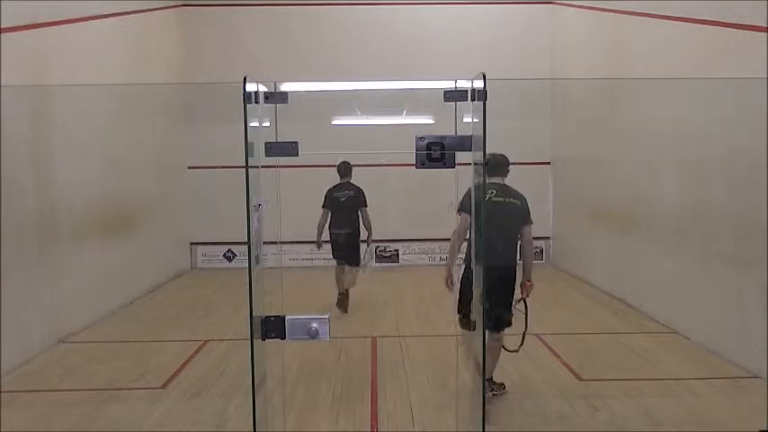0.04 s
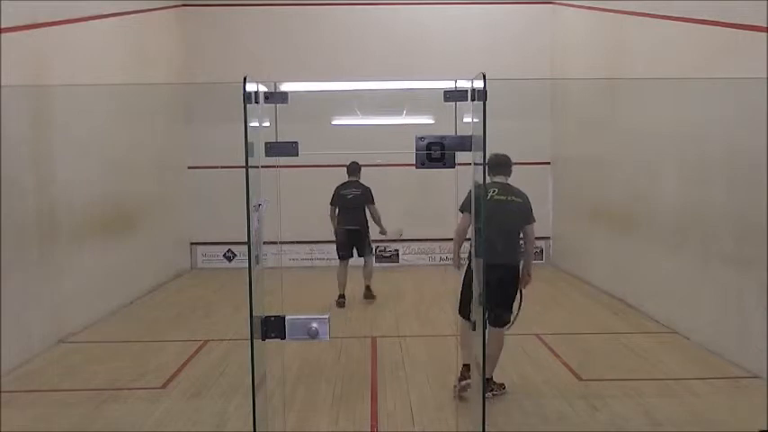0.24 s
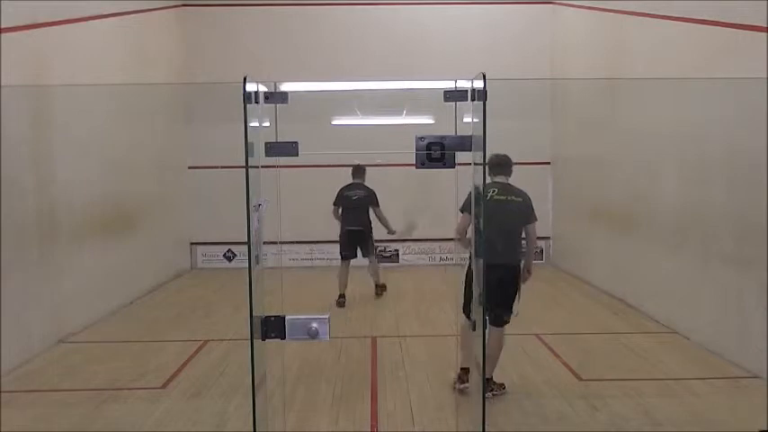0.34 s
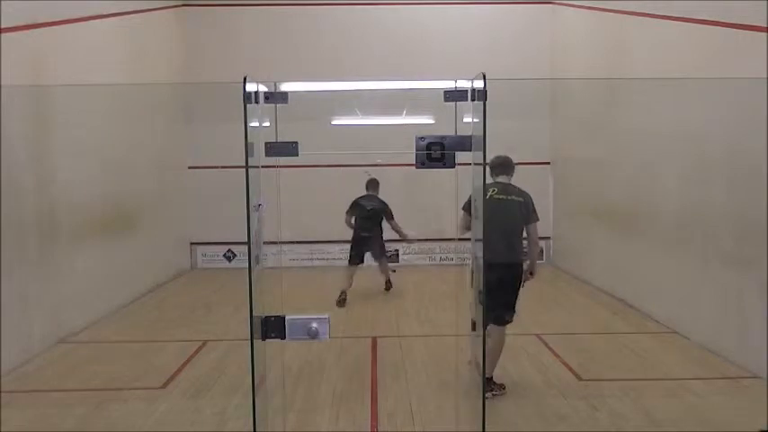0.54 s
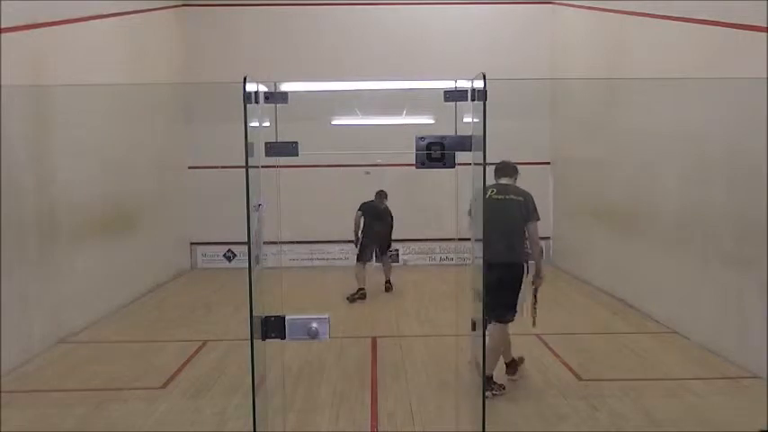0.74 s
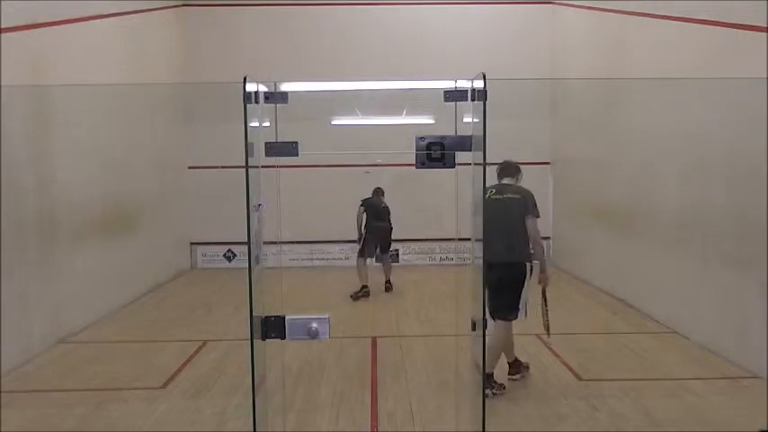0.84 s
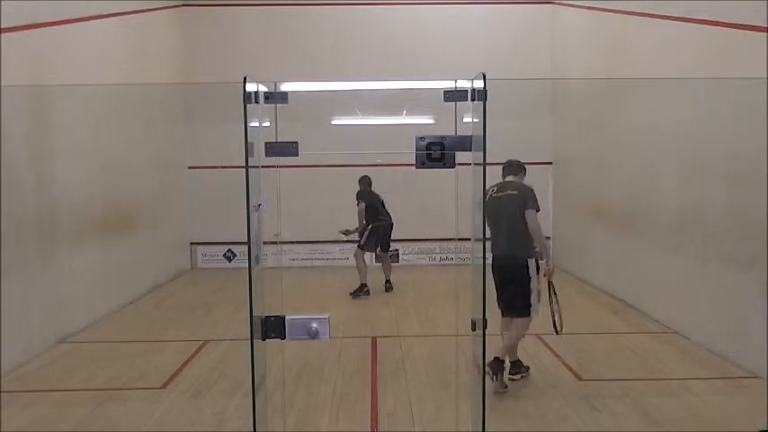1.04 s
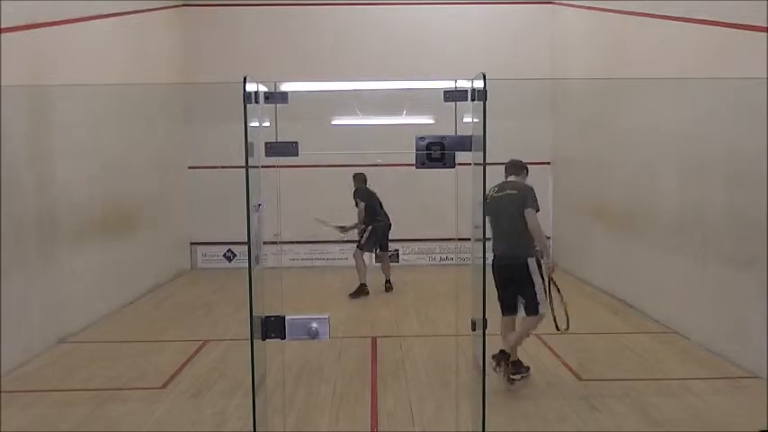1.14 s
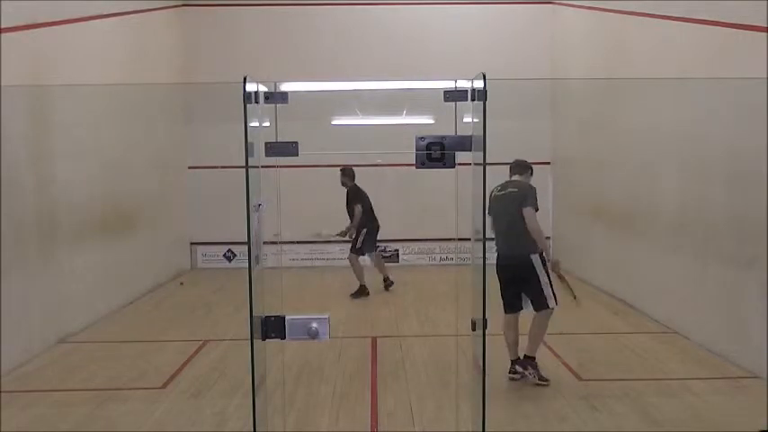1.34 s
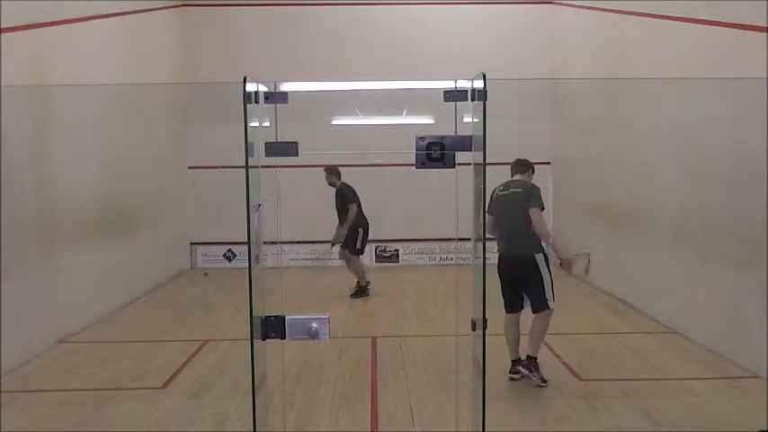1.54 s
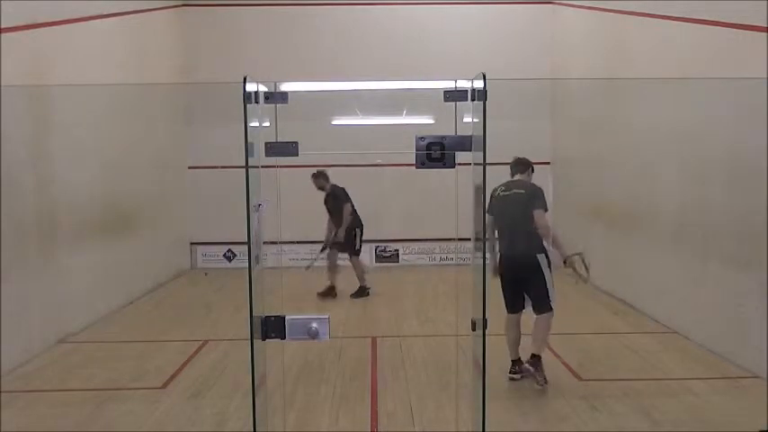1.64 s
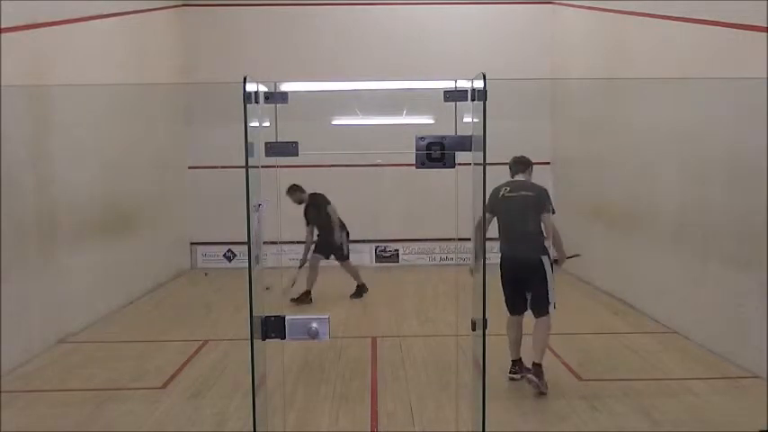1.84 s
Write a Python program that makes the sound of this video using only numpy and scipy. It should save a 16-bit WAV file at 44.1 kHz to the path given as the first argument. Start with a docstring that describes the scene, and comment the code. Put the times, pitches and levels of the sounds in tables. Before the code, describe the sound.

Echoing squash shot on an indoor court, with ball bounces, footsteps and a shoe squeak.

```python
"""Indoor racket court, heard from behind its glass back wall during a rally.
The hollow ball bounces, is struck, booms off the front wall and bounces again; each blow
returns as hard echoes and a long wash. Shoes thump, scuff and squeak on the sprung wooden
floor, over steady hall air and the dying wash of earlier play."""
import sys
import numpy as np
from scipy import signal
from scipy.fft import rfft, irfft
from scipy.io import wavfile
from scipy.ndimage import uniform_filter1d

SR = 44100
rng = np.random.default_rng(int(sys.argv[2]) if len(sys.argv) > 2 else 0)


def waveform_to_disk(signal):
    """Save audio, clipped to [-1, 1], as 16-bit WAV at the path in sys.argv[1]."""
    frames = np.transpose(np.atleast_2d(signal))
    scaled = np.clip(frames, -1, 1) * 32767
    samples = np.round(scaled).astype(np.int16)
    wavfile.write(sys.argv[1], SR, samples)


N = 83790
T = np.arange(N) / SR
CONTACT_S = 0.0038


def amp(db):
    """Decibels to gain."""
    return 10 ** (np.asarray(db) / 20)


def unit(x):
    """Scale to rms 1."""
    return x / np.sqrt(np.mean(x ** 2) + 1e-20)


def read(points, hz):
    """Interpolate a table over log frequency."""
    points_hz, values = np.transpose(points)
    return np.interp(np.log(hz + 1), np.log(points_hz + 1), values)


def add(mix, start_s, sound):
    """Mix a sound in at start_s."""
    part = mix[:, max(round(start_s * SR), 0):][:, :sound.shape[-1]]
    part += sound[..., :part.shape[1]]


def noise(colour):
    """Diffuse stereo noise, rms 1, near mono in the bass; colour rows: freq_hz, level_db."""
    # side against mid: freq_hz, level_db
    width = [(250, -21.5), (600, -15.5), (1200, -10), (5000, -4.5), (8000, -1), (13000, -4.5)]
    hz = np.fft.rfftfreq(N, 1 / SR)
    mid, side = rfft(rng.standard_normal((2, N))) * amp(read(colour, hz))
    side = side * amp(read(width, hz))
    return unit(irfft([mid + side, mid - side], N))


def pulse(colour, size=4096):
    """Minimum-phase ring with the energy of 10 ms at rms 1."""
    hz = abs(np.fft.fftfreq(size, 1 / SR))
    log_gain = np.log(amp(read(colour, hz)))
    spectrum = np.exp(np.conj(signal.hilbert(log_gain)))
    ring = np.fft.ifft(spectrum).real[:size // 2]
    return ring / np.linalg.norm(ring) * np.sqrt(SR / 100)


def wash(colour, build_s, treble_build_s=0.032):
    """Reverberation of one blow: builds up, treble last, then dies band by band."""
    # court decay: freq_hz, t60_s
    court = [(100, 0.04), (300, 1.86), (1200, 2), (5000, 1.5), (8000, 1), (14000, 0.7)]
    hz, t, bands = signal.stft(noise(colour), SR, nperseg=512)
    rise_s = np.minimum(hz / 4000, 1)[:, None] * treble_build_s
    rise = 1 - np.exp(-t / (rise_s + 1e-12))
    decay = amp(-60 * t / read(court, hz)[:, None])
    _, tail = signal.istft(bands * decay * rise, SR, nperseg=512)
    return tail[:, :N] * np.minimum(T / build_s, 1)


def in_court(dry, room_db):
    """A sound plus its reverberation."""
    tail = wash([(20, 0), (20000, 0)], build_s=0.02)
    wet = signal.fftconvolve(dry, tail / np.linalg.norm(tail[0]), axes=1)[:, :N]
    return dry + amp(room_db) * wet


def hall(air_db=-40, earlier_db=-28.5, fade_db_per_s=9):
    """Steady air, and the wash of earlier play dying away."""
    # air and wash spectra: freq_hz, level_db
    air = [(28, -34), (75, 4.5), (150, -5), (600, -0.5), (2700, -27.5), (5000, -25), (13000, -39)]
    earlier = [(50, -8.5), (320, 5.5), (1450, 2), (2400, -13.5), (4000, -17.5), (8000, -23.5), (15000, -40)]
    return amp(air_db) * noise(air) + amp(earlier_db - fade_db_per_s * T) * noise(earlier)


def scuffs(grit_db=2.8):
    """Soles brush the boards in short gritty swells."""
    # scuffs: start_s, length_s, level_db
    brushes = [(0.078, 0.12, -45), (0.241, 0.17, -39.5), (1.057, 0.03, -48.5), (1.29, 0.15, -49)]
    # friction spectrum: freq_hz, level_db
    colour = [(700, -7), (3000, 2), (5000, 2), (8500, -7), (15000, -26)]
    out = np.zeros((2, N))
    for start_s, length_s, level_db in brushes:
        t = T[:round(length_s * SR)]
        grit = amp(grit_db * unit(uniform_filter1d(rng.standard_normal(N), size=90)))
        swell = np.sin(np.pi * t / length_s) ** 0.46
        add(out, start_s, amp(level_db) * swell * (noise(colour) * grit)[:, :len(t)])
    return in_court(out, room_db=4.5)


def squeaks(waver_depth=0.03):
    """Rubber soles stick and slip at a high, unsteady pitch."""
    # squeaks: start_s, length_s, pitch_hz, level_db
    slips = [(.665, 0.06, 6250, -32.5), (.675, 0.05, 5790, -29), (.738, 0.045, 5770, -31),
             (0.68, 0.16, 6450, -39.5)]
    out = np.zeros((2, N))
    for start_s, length_s, pitch_hz, level_db in slips:
        t = T[:round(length_s * SR)]
        waver = unit(uniform_filter1d(rng.standard_normal(N), size=70))[:len(t)]
        phase = 2 * np.pi * np.cumsum(pitch_hz * (1 + waver_depth * waver)) / SR
        add(out, start_s, amp(level_db) * np.sin(np.pi * t / length_s) * np.sin(phase))
    return in_court(out, room_db=-1)


def low_thuds(rise_s=0.0075, band_ratio=1.41):
    """Footfalls on the sprung floor, a low ring just after the racket stroke, and one heel slap."""
    # thuds: start_s, level_db, pitch_hz, t60_s
    thuds = [(0.064, -31, 97, 1), (.2, -29.5, 104, .6), (.232, -19.5, 229, 0.95), (0.312, -23.5, 135, 0.18),
             (.428, -18, 355, 0.2), (0.602, -35.5, 102, 0.15), (1.472, -31.5, 110, 0.22),
             (1.532, -32.5, 81, 1), (1.533, -31, 594, .45)]
    # heel slap: start_s, level_db, t60_s
    heel = (1.471, -30.5, 0.14)
    out = np.zeros((2, N))
    rise = np.minimum(T / rise_s, 1)
    for start_s, level_db, hz, t60_s in thuds:
        band = [(hz / 3, -34), (hz / band_ratio, -7), (hz, 0),
                (hz * band_ratio, -7), (hz * 3, -30), (hz * 20, -65)]
        thud = noise(band) * rise * amp(-60 * T / t60_s)
        thud /= np.sqrt(np.sum(thud[0] ** 2) / (SR * 0.028))  # energy of 28 ms at rms 1
        add(out, start_s, amp(level_db) * thud)
    start_s, level_db, t60_s = heel
    slap = noise([(400, -17), (3000, 0), (6000, -13), (15000, -40)])
    add(out, start_s, amp(level_db - 60 * T / t60_s) * rise * slap)
    return in_court(out, room_db=-8.5)


def ticks(t60_s=0.011):
    """Thin, sharp ticks, the first an overload click on the loudest boom."""
    # ticks: start_s, level_db
    arrivals = [(.5122, -36), (.5901, -23), (1.083, -44)]
    # tick spectrum: freq_hz, level_db
    colour = [(2000, -13), (12000, 4), (16000, -10)]
    out = np.zeros((2, N))
    for start_s, level_db in arrivals:
        add(out, start_s, amp(level_db - 60 * T / t60_s) * noise(colour))
    return out


def hollow_note(start_s=0.42, level_db=-18, build_s=0.041, t60_s=2.29):
    """The ball's own note hangs between the walls, outlasting the wash."""
    # note spectrum: freq_hz, level_db
    colour = [(490, -45), (535, 0.5), (625, 4), (700, -50)]
    out = np.zeros((2, N))
    envelope = amp(level_db - 60 * T / t60_s) * np.minimum(T / build_s, 1)
    add(out, start_s, envelope * noise(colour))
    return out


def bounces():
    """The ball meets the floor and fills the court with a wash."""
    # floor contacts: start_s, level_db
    contacts = [(.223, -19.5), (1.224, -23.5)]
    # wash spectrum: freq_hz, level_db
    colour = [(50, -23), (340, 1), (1500, -1), (2600, -18), (3800, -20), (15000, -52)]
    out = np.zeros((2, N))
    for start_s, level_db in contacts:
        add(out, start_s, amp(level_db) * wash(colour, build_s=0.025))
    return out


def knocks(t60_s=0.075, band_ratio=1.063):
    """Short, pitched knocks of the ball on wood and plaster."""
    # knocks: start_s, level_db, pitch_hz
    contacts = [(.261, -13.5, 940), (.380, -13, 780), (.424, -15, 800), (.528, -10, 810),
                (1.266, -21, 1140)]
    out = np.zeros((2, N))
    rise = np.minimum(T / CONTACT_S, 1)
    for start_s, level_db, hz in contacts:
        band = [(hz / 2, -30), (hz / band_ratio, 0), (hz * band_ratio, 0), (hz * 2, -30), (hz * 10, -60)]
        add(out, start_s, amp(level_db - 60 * T / t60_s) * rise * noise(band))
    return out


def cracks(t60_s=0.023, snap_db=-10.5, dull_above_hz=5000):
    """Hard walls throw back bright snaps, each with a spray of scatter; weaker ones are duller."""
    # reflections: start_s, level_db
    arrivals = [(0.4303, -25.5), (0.4383, -22.5), (.528, -18.5), (0.5303, -22.5), (0.5342, -19.5),
                (0.5843, -19.5), (.5875, -19.5)]
    # loudest crack's spectrum: freq_hz, level_db
    bright = [(300, -39), (1500, 12), (2700, -1.5), (3900, 10), (6000, 7.5), (9000, -3.5), (16000, -17)]
    out = np.zeros((2, N))
    loudest_db = max(db for _, db in arrivals)
    for start_s, level_db in arrivals:
        loss_db_per_oct = loudest_db - level_db
        colour = [(hz, db - loss_db_per_oct * max(np.log2(hz / dull_above_hz), 0)) for hz, db in bright]
        add(out, start_s, amp(level_db + snap_db) * pulse(colour))
        add(out, start_s, amp(level_db - 60 * T / t60_s) * noise(colour))
    return out


def blow(arrivals, wash_colour, tail):
    """The hollow ball squashes and booms; the walls send copies that blur into a wash."""
    # boom spectrum: freq_hz, level_db
    boom_colour = [(130, -36), (300, -11.5), (460, -17), (545, 2.5), (620, 3.5), (700, -9.5), (880, -7),
                   (1100, -23.5), (2000, -13.5), (3300, -52.5)]
    boom = pulse(boom_colour)
    squash = np.sin(np.pi / 2 * np.minimum(T[:len(boom)] / CONTACT_S, 1))
    out = np.zeros((2, N))
    for start_s, level_db in arrivals:
        add(out, start_s, amp(level_db) * boom * squash)
    start_s, level_db, build_s = tail
    add(out, start_s, amp(level_db) * wash(wash_colour, build_s))
    return out


def racket_stroke():
    """The racket strikes the ball."""
    # boom and echoes: start_s, level_db
    arrivals = [(.379, -16), (.388, -17), (.410, -13.5), (.4265, -10.5), (.4365, -9), (.453, -15),
                (.4645, -14)]
    # wash spectrum: freq_hz, level_db
    colour = [(120, -43), (330, -7), (450, -14.5), (580, -3.5), (880, -5), (1100, -17), (2000, -19),
              (2700, -31), (8000, -33), (15000, -66)]
    # wash onset: start_s, level_db, build_s
    tail = (.408, -14, 0.0081)
    return blow(arrivals, colour, tail)


def front_wall_hit():
    """The ball booms off the front wall."""
    # boom and echoes: start_s, level_db
    arrivals = [(.5085, -6.5), (.518, -16), (.530, -12.5), (.541, -13.5), (.548, -15), (.5595, -11.5),
                (.574, -12), (.594, -13), (.603, -13), (.638, -12.5), (.837, -20.5)]
    # wash spectrum: freq_hz, level_db
    colour = [(130, -55), (300, -13.5), (560, -1.5), (880, -4.5), (1050, -18.5), (1400, -13.5), (2250, -19),
              (2900, -29.5), (3900, -22.5), (6500, -24.5), (11000, -34), (15500, -54)]
    # wash onset: start_s, level_db, build_s
    tail = (.516, -13.5, 0.015)
    return blow(arrivals, colour, tail)


def scene():
    """Ball, ticks, thuds, shoes and hall together."""
    shot = racket_stroke() + front_wall_hit() + hollow_note() + cracks()
    return shot + ticks() + bounces() + knocks() + low_thuds() + scuffs() + squeaks() + hall()


def record(dry):
    """Slight lean to the left, soft overload at full scale, then a low-pass."""
    left_db, cutoff_hz = 0.32, 15850
    panned = dry * amp([[left_db], [-left_db]])
    limited = panned / (1 + panned ** 8) ** (1 / 8)
    lowpass = signal.firwin(511, cutoff_hz, window=("kaiser", 9), fs=SR)
    return signal.oaconvolve(limited, lowpass[None], "same")


dry = scene()
out = record(dry)
waveform_to_disk(out)
```